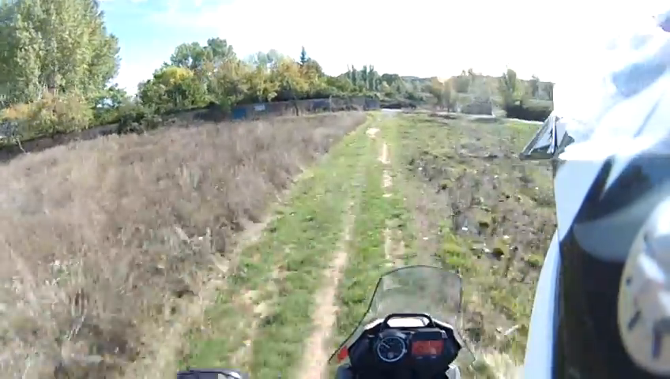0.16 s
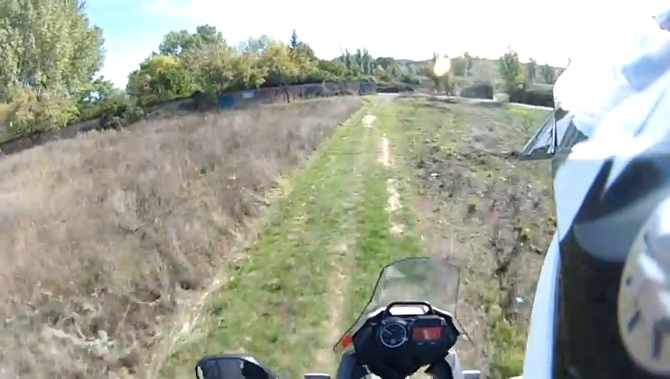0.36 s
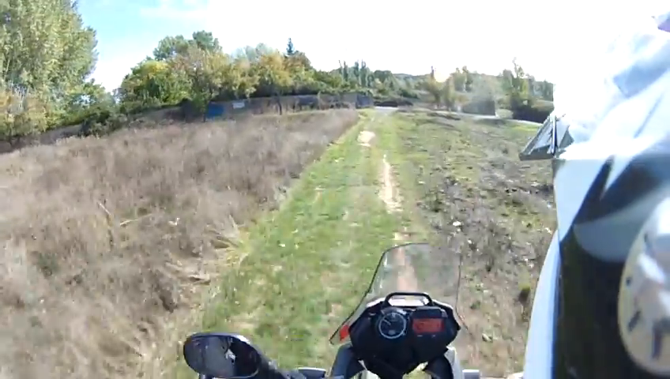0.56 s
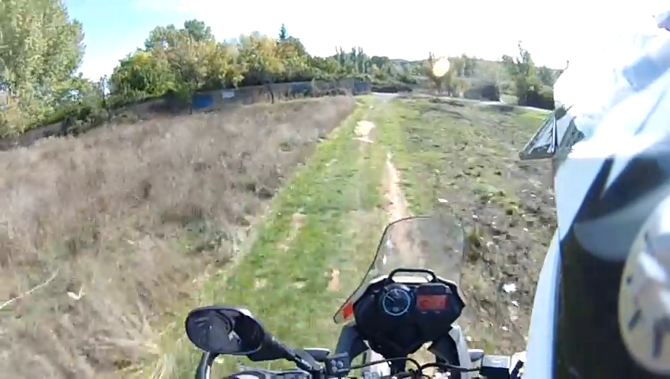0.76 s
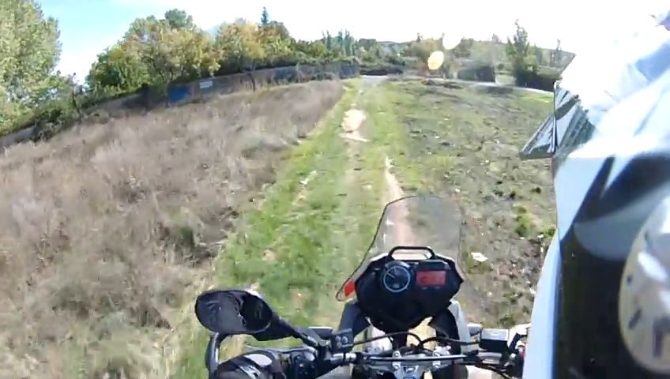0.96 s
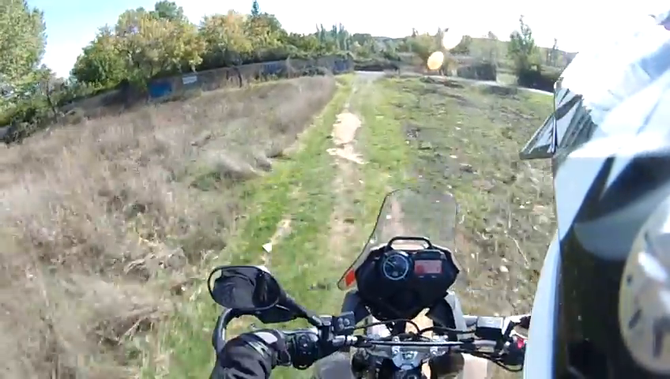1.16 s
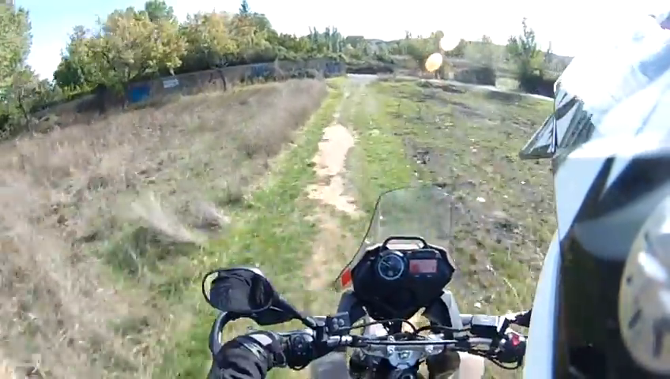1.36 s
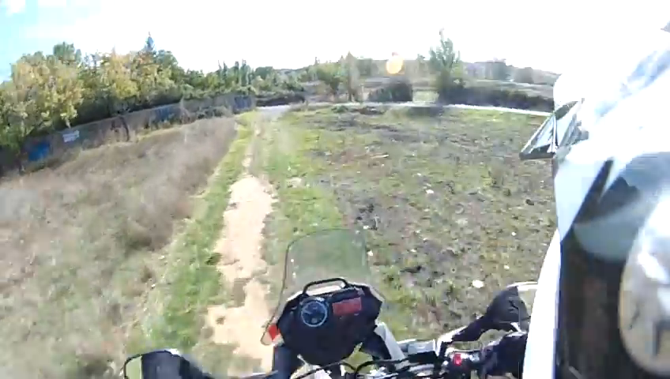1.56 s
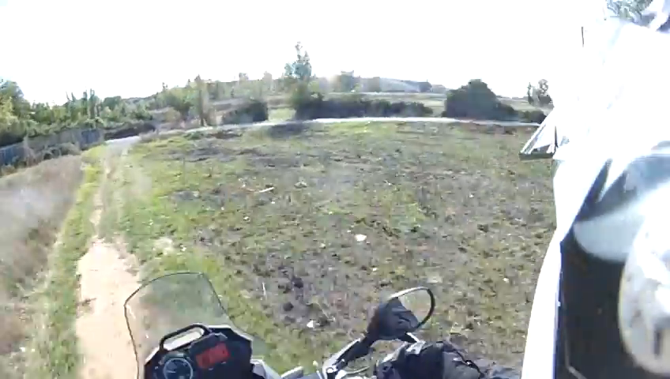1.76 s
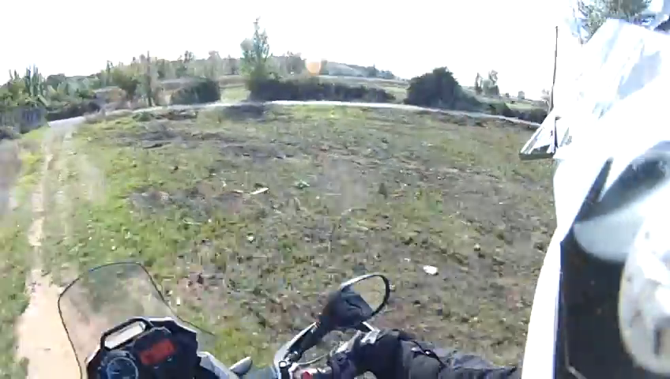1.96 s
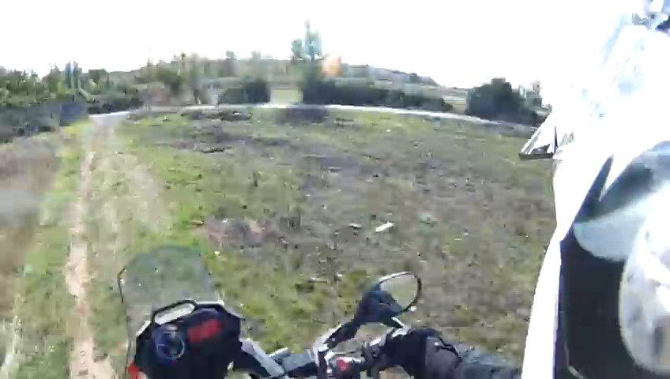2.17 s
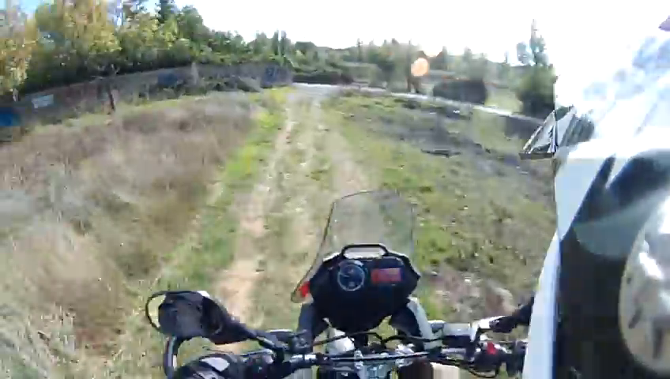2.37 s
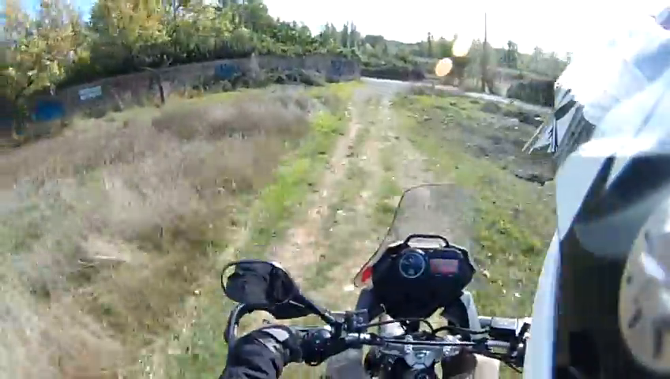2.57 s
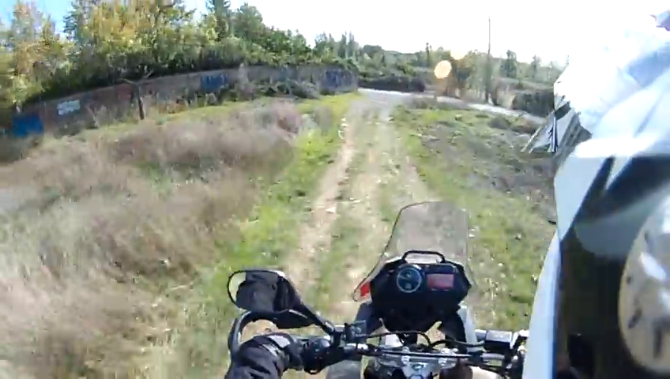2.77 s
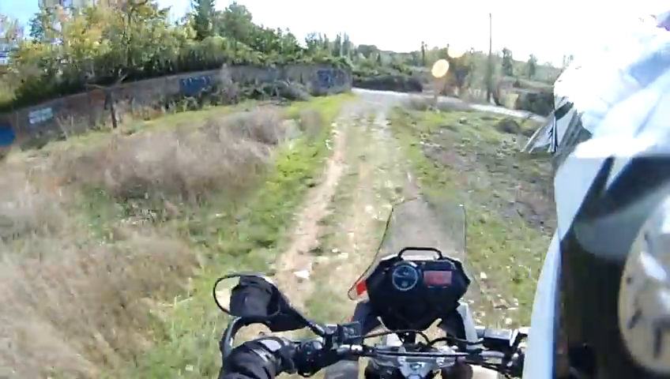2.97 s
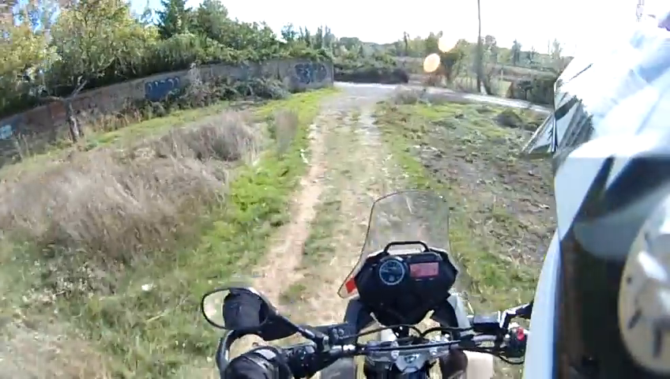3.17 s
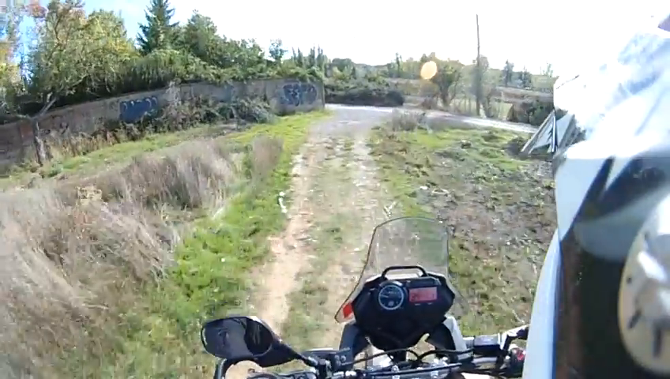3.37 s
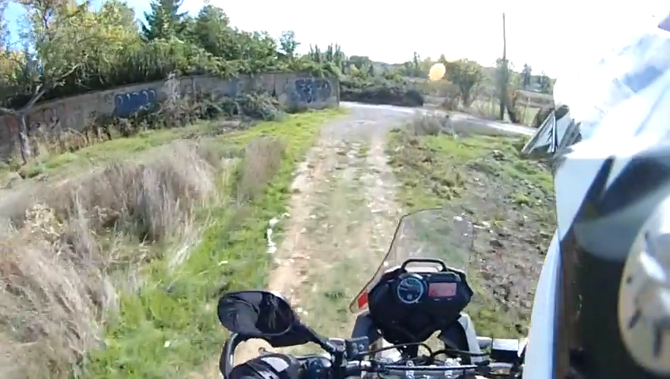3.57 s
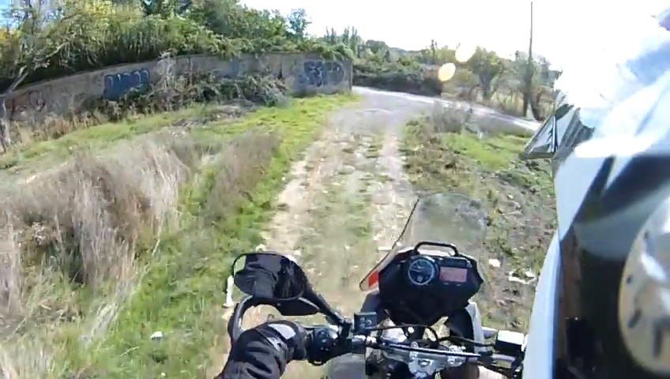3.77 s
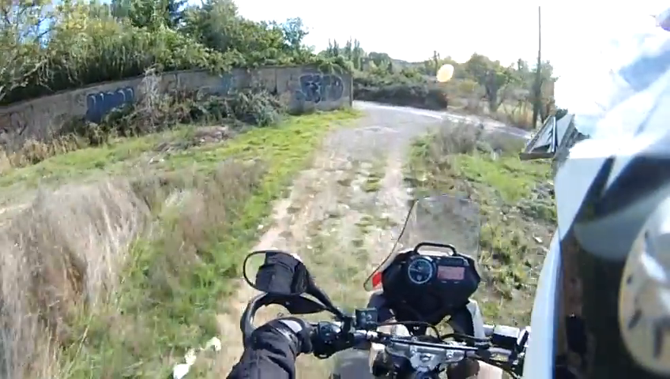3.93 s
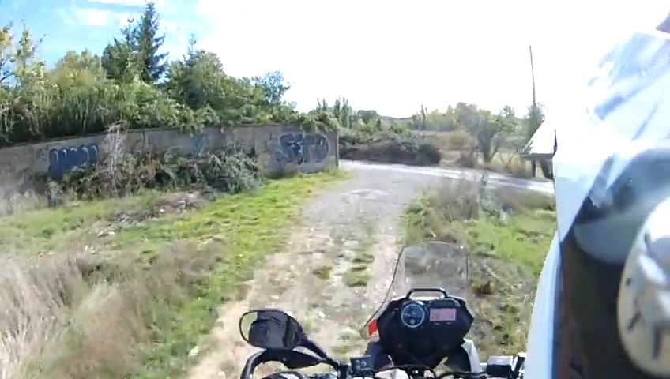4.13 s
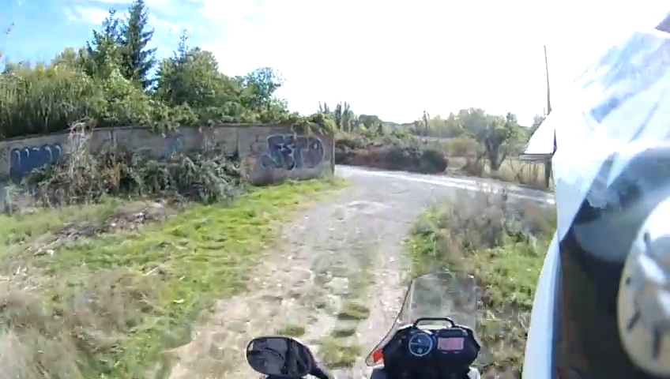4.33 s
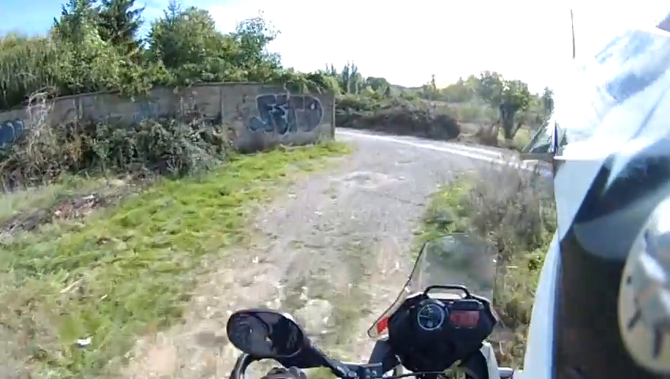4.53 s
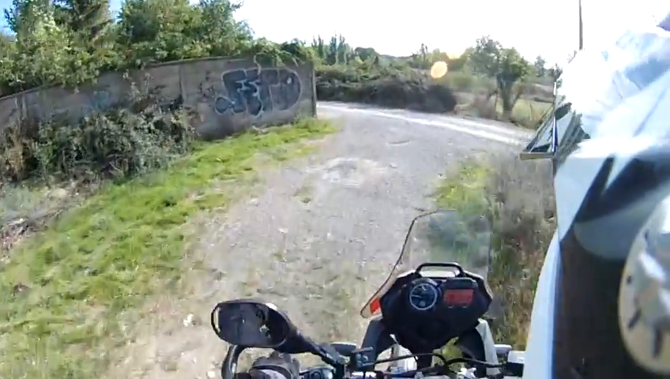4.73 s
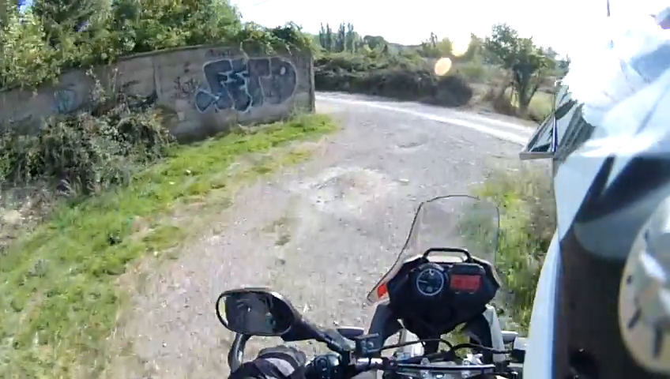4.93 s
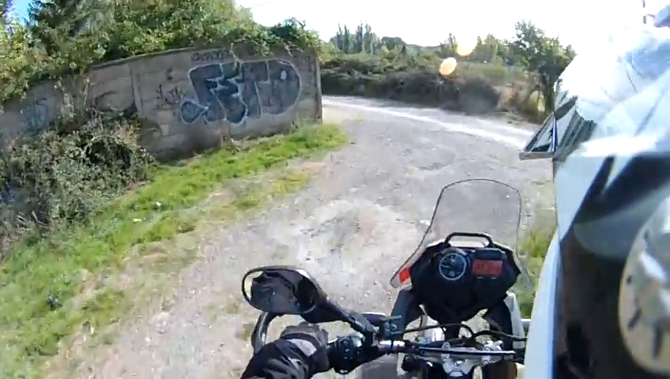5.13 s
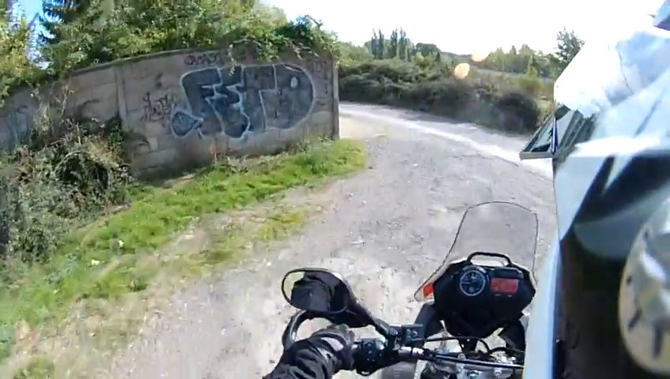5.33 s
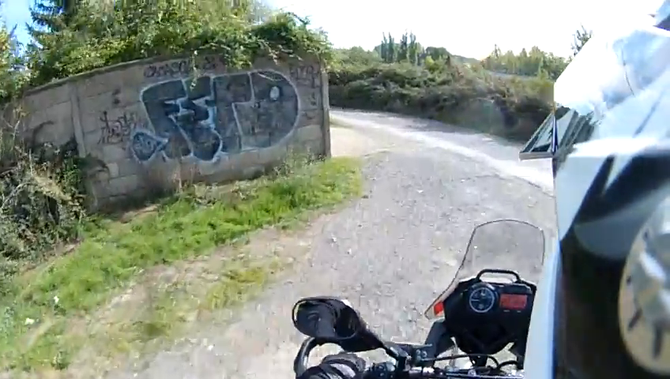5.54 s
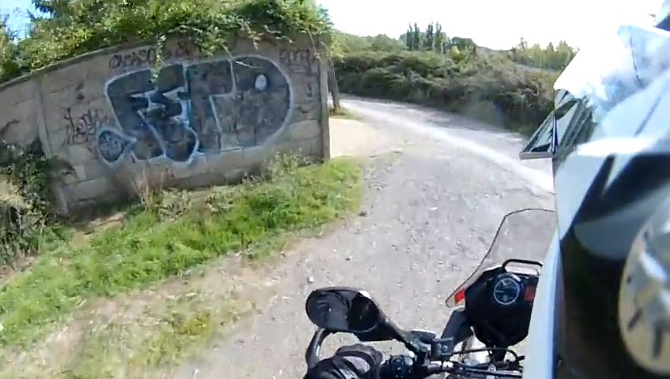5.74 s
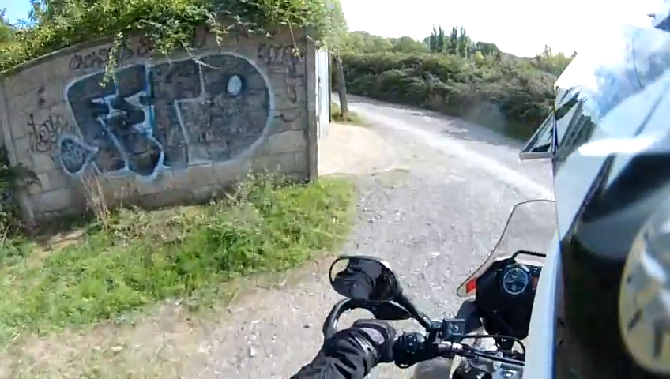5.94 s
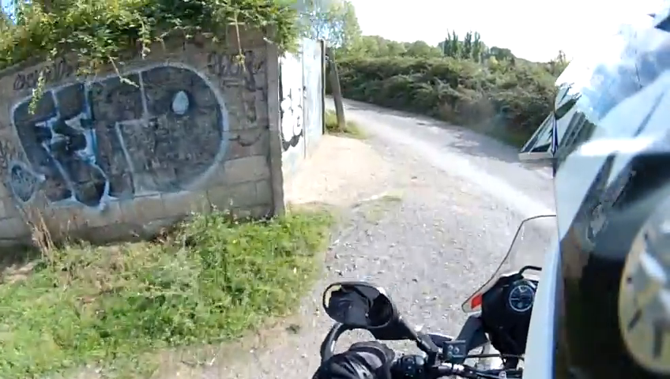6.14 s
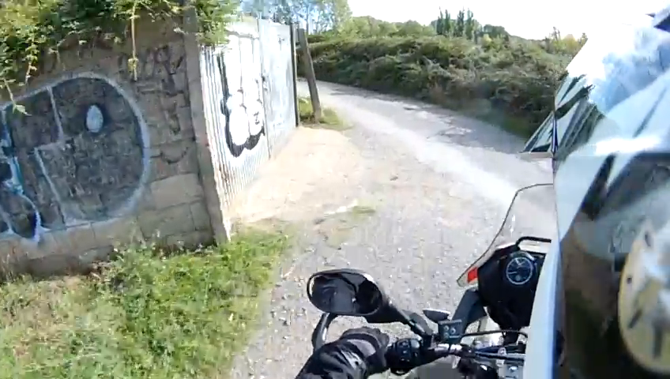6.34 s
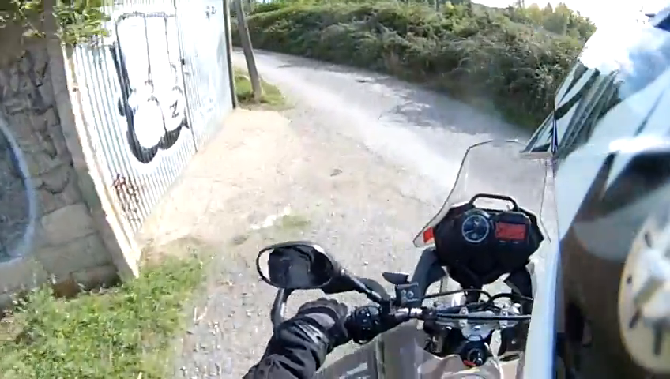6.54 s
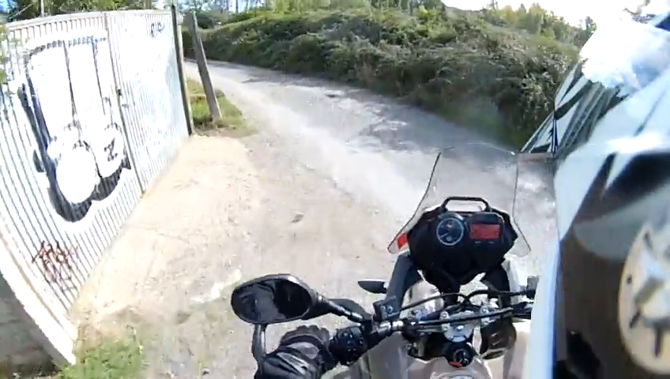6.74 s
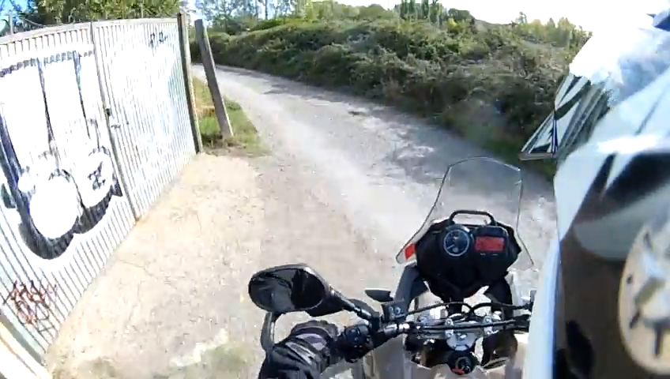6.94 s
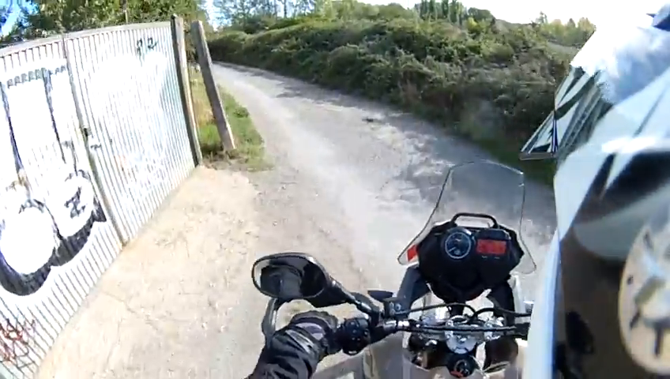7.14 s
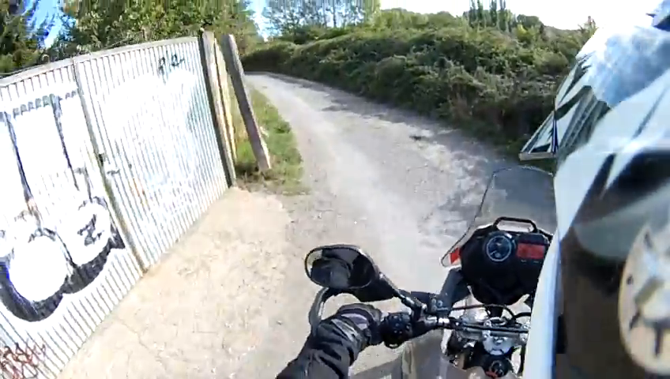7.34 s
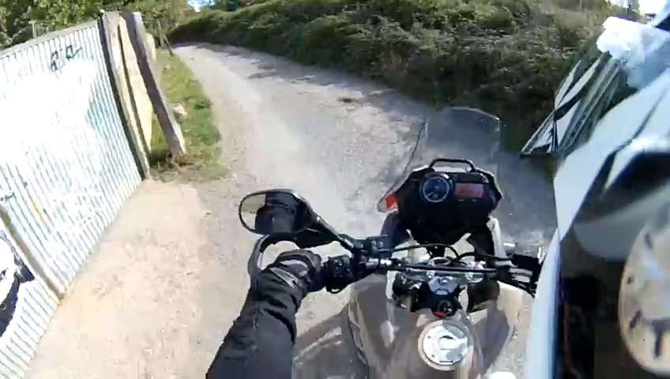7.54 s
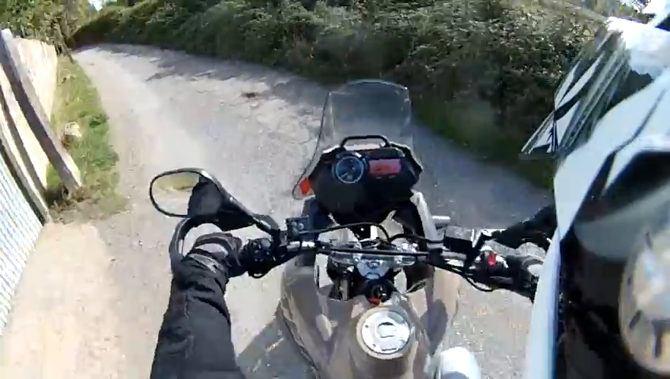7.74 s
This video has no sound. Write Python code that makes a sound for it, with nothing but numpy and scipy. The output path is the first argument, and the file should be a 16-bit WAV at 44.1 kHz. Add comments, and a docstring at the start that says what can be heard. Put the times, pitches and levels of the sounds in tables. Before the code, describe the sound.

Muffled motorcycle ride: roaring wind and low thuds fade as the engine putters slower, knocks and boot scuffs follow, then quiet handling rustle and still air.

```python
"""Wind buffets a sealed helmet camera while its rider's single-cylinder motorcycle slows on a dirt track and stops.
The wind is noise mixed with small pressure pulses, split into rumble, roar and hiss; low slaps are fading noise.
The engine hums, thumps, puffs and ticks faintly, timed by its firing cycle. Hard knocks (loud engine ticks, later
bumps of the helmet) are noise bursts and ringing pushes; rubs are grainy noise through the modes of the shell. The
mount pings and creaks as sine tones; a dragged boot, two brake squeaks, still air and circuit hiss are shaped noise."""
import sys
import numpy as np
from scipy import signal
from scipy.fft import rfft, irfft
from scipy.io import wavfile
from scipy.ndimage import uniform_filter1d, map_coordinates

SR = 44100
rng = np.random.default_rng(int(sys.argv[2]) if len(sys.argv) > 2 else 0)


def inscribe(sig):
    """Save sig as 16-bit PCM at rate SR to the path in sys.argv[1].

    A 1-D sig is mono; a 2-D sig holds one channel per row.
    Samples are clipped to [-1, 1] before scaling.
    """
    pcm = np.round(np.clip(np.atleast_2d(sig).T, -1, 1) * 32767)
    wavfile.write(sys.argv[1], SR, pcm.astype(np.int16))


N = 343980
T = np.arange(N) / SR  # time of every sample [s]

# Tone of the turbulence at the port, shared by wind and slaps: (frequency [Hz], relative level [dB])
WIND_COLOUR = [(11, -48), (18, -26.5), (85, -8), (175, 1), (212, 1), (344, 0), (557, 0), (692, -3),
               (971, -10), (1460, -24.5), (2160, -30.5), (3330, -38.5), (3850, -38), (4790, -47),
               (5810, -65), (7550, -84), (12800, -120)]


def undb(db):
    """Turn decibels into a plain multiplier."""
    return 10 ** (np.asarray(db) / 20)


def unit(x):
    """Scale a sound to an average (RMS) level of 1."""
    return x / np.sqrt(np.mean(x ** 2))


def columns(table):
    """Draw straight lines between a table's times: one value a sample for each later column."""
    s, *rest = np.transpose(table)
    return [np.interp(T, s, c) for c in rest]


def colour(x, points, size=4096):
    """Filter with the gain of (Hz, dB) points, never sounding before its input (folded cepstrum)."""
    hz, db = np.transpose(points)
    bins = np.maximum(np.arange(size // 2 + 1) * SR / size, 1)
    log_gain = np.interp(np.log(bins), np.log(hz), db) * np.log(10) / 20
    cepstrum = irfft(log_gain)
    cepstrum[1:size // 2] *= 2
    cepstrum[size // 2 + 1:] = 0
    response = irfft(np.exp(rfft(cepstrum)))
    return signal.fftconvolve(x, response)[:N]


def ring(x, modes):
    """Sum of (Hz, width Hz, dB) resonances, each applied twice for dark valleys between them."""
    out = 0
    for hz, width, db in modes:
        # two passes narrow the peak, so each one starts wider
        b, a = signal.iirpeak(hz, hz / (1.5 * width), SR)
        once = signal.lfilter(b, a, x)
        out = out + undb(db) * signal.lfilter(b, a, once)
    return out


def walk(rate):
    """A wandering random curve: levels drawn at the rate [per s], smoothed twice, RMS 1."""
    k = int(SR / rate)
    steps = np.repeat(rng.standard_normal(N // k + 1), k)
    return unit(uniform_filter1d(uniform_filter1d(steps, k), k)[:N])


def grains(rate, scatter_db):
    """One-sided pressure pulses at random moments, a few larger than the rest."""
    hit = rng.random(N) < rate / SR
    x = hit * undb(scatter_db * np.minimum(rng.exponential(size=N), 5))
    return unit(x - x.mean())


def hold(s, length, rise, fall):
    """Ramp up to 1 by time s, hold for the length, then ramp down to 0."""
    corners = np.cumsum([s - abs(rise), abs(rise), abs(length), abs(fall)])
    return np.interp(T, corners, [0, 1, 1, 0])


def decay(t, t60):
    """Exponential fade that falls 60 dB in t60 seconds."""
    return np.exp(-t * np.log(1000) / t60)


def still_air():
    """Soft noise of the still air, with a slightly unsteady level."""
    # tone of the still air: (frequency [Hz], relative level [dB])
    air_tone = [(11, -45.5), (18, -17.5), (85, 5), (171, -0.5), (269, -2.5), (539, 2), (981, 3.5),
                (1310, -12.5), (2950, -17.5), (3250, -20.5), (5500, -37.5), (7150, -59), (12100, -120)]
    level_db = -62.5
    return unit(colour(rng.standard_normal(N), air_tone)) * undb(level_db + 1.2 * walk(20))


def brake():
    """A pad sings unsteadily as the disc slides by: noise through one narrow resonance."""
    # squeaks: (middle time [s], half length [s], level [dB])
    squeaks = [(6.08, .035, -86), (6.555, .045, -82)]
    squeak_hz, width_hz = 7200, 80
    song = unit(ring(rng.standard_normal(N), [(squeak_hz, width_hz, 0)]))
    return song * sum(undb(db) * np.exp(-((T - s) / half) ** 2) for s, half, db in squeaks)


def scrape():
    """A boot sole drags on gravel: dense grit clicks and noise excite broad resonances."""
    # drags of the boot: (time [s], length [s], level [dB])
    drags = [(5.88, 0.09, -60.5), (5.962, 0.036, -52), (6.004, 0.036, -52.5), (6.06, 0.224, -64)]
    # resonances of the grit: (frequency [Hz], width [Hz], level [dB])
    grit_modes = [(1510, 220, 1.5), (2350, 220, 3), (2630, 90, 2), (3330, 500, -7), (4500, 800, -11)]
    rise_s, fall_s = 0.012, 0.027
    grit = rng.standard_normal(N) + .6 * grains(400, scatter_db=2.5)
    drag = sum(undb(db) * hold(s, length, rise_s, fall_s) ** 2 for s, length, db in drags)
    return unit(ring(grit, grit_modes)) * drag


def creak():
    """The mount slips in regular stick-slip: a wavering, sagging tone with a weak third multiple."""
    start_s, length_s, level_db = 6.842, .05, -41
    start_hz, sag_hz_per_s = 370, 1150
    hz = start_hz - sag_hz_per_s * np.clip(T - start_s, 0, length_s)
    phase = 2 * np.pi * np.cumsum(hz * (1 + 0.03 * walk(90))) / SR
    tone = unit(np.sin(phase) + undb(-15) * np.sin(3 * phase))
    slipping = hold(start_s, length_s, 0.0094, 0.0067)
    return tone * undb(level_db + 1.5 * walk(60)) * slipping


def rubs():
    """Stick-slip grains of cloth ring the lowest, the middle and the high modes of the flexing shell."""
    # rubs: (time [s], length [s], middle modes [dB], lowest modes [dB], high modes [dB])
    touches = [(6.602, 0.018, -39.5, -40, -54), (6.638, 0.043, -47.5, -48, -54.5),
               (6.689, 0.074, -42.5, -61, -52), (6.779, 0.045, -52, -68, -57),
               (6.842, 0.018, -57, -55, -60), (6.864, 0.035, -48, -50, -50.5),
               (6.958, 0.036, -70, -72, -62), (7.518, 0.058, -55, -71, -69), (7.583, 0.006, -54, -43, -55),
               (7.598, 0.031, -50, -43.5, -48.5), (7.641, 0.033, -45.5, -52, -50),
               (7.687, 0.044, -57, -62, -61)]
    # modes of the helmet shell: (frequency [Hz], width [Hz], level [dB])
    shell = [(132, 45, 0), (240, 80, -8), (355, 60, 0), (440, 60, -2), (530, 70, -5), (980, 50, -1),
             (1200, 100, -7), (1400, 150, -12), (2080, 320, -12), (2620, 280, -16), (3300, 180, -15),
             (4900, 1200, -33)]
    rise_s, fall_s = 0.0085, 0.028
    bend_s, flicker_db = .0002, 2  # flexing bends the pitch; each mode comes and goes
    slip = rng.standard_normal(N) + 0.58 * grains(270, scatter_db=0.5)
    modes = [ring(slip, [mode]) * undb(flicker_db * walk(25)) for mode in shell]
    bent = (T + bend_s * walk(30)) * SR  # read positions that run slightly early or late
    groups = modes[:2], modes[2:5], modes[5:]
    boom, body, edge = (unit(map_coordinates(sum(group), [bent], mode="mirror")) for group in groups)
    out = 0
    for s, length, body_db, boom_db, edge_db in touches:
        touch = hold(s, length, rise_s, fall_s) ** 2
        out = out + (body * undb(body_db) + boom * undb(boom_db) + edge * undb(edge_db)) * touch
    return out


def pings():
    """Single modes of the mount swell quickly and die away, wavering a little."""
    # pings: (time [s], frequency [Hz], level [dB], 60 dB decay time [s])
    struck_modes = [(5.484, 2400, -41, 0.046), (5.932, 1980, -39, 0.028), (5.968, 697, -25.5, 0.064),
                    (5.979, 2400, -42, .06), (5.994, 450, -36, .06), (6.018, 2580, -44, .04),
                    (6.045, 2550, -47, .04), (6.603, 970, -42, .12), (7.632, 990, -48, .12),
                    (7.665, 2700, -55, .05)]
    rise_s = 0.0017
    out, waver = 0, .08 * walk(150)  # waver in turns of the tone
    for s, hz, db, t60 in struck_modes:
        t = np.maximum(T - s, 0)
        fade = (1 - np.exp(-(t / rise_s) ** 2)) * decay(t, t60)
        out = out + undb(db) * fade * np.sin(2 * np.pi * (hz * t + rng.random() + waver))
    return out


def knocks():
    """Hard knocks: loud engine ticks, and later bumps of the helmet; a push and noise ring a dull thud, with a crack."""
    # knocks: (time [s], thud peak [dB], thud pitch [Hz], crack peak [dB], crack treble peak [dB],
    #          60 dB decay time of the noise [s])
    hits = [(2.430, -35, 500, -48, -50, .03), (3.619, -43, 500, -32, -45, 0.038),
            (3.674, -45, 504, -57, -50, .025), (3.945, -48, 500, -37, -58, 0.044),
            (3.997, -47, 500, -35, -49, .03), (4.051, -49, 500, -44, -48, 0.033),
            (4.225, -44, 500, -52, -53, .05), (4.334, -31, 500, -39, -47, .04),
            (4.382, -42, 500, -47, -61, .03), (4.465, -54, 500, -47, -65, .04),
            (4.525, -43, 497, -47, -46, .027), (4.58, -46, 500, -40, -55, 0.038),
            (4.649, -42, 504, -39, -59, 0.044), (4.725, -47, 600, -36, -50, 0.037),
            (4.8116, -11, 434, -27, -45, 0.064), (4.8166, -15.5, 575, -26.5, -39.5, 0.039),
            (5.009, -57, 500, -63, -52, .025), (5.057, -54, 500, -49, -48, 0.033),
            (5.105, -44, 500, -34, -56, .05), (5.216, -55, 500, -62, -58, .02),
            (5.311, -38, 700, -36, -51, .034), (5.485, -40, 600, -42, -58, .04),
            (5.630, -23, 825, -42, -61, 0.041), (5.932, -44, 500, -39, -63, .02),
            (5.958, -34, 600, -34, -44, 0.03), (5.977, -32, 680, -33, -46, .025),
            (6.02, -44, 500, -50, -56, .03), (6.599, -46, 330, -42, -72, .03),
            (6.663, -33, 990, -60, -70, .03), (6.768, -31.5, 750, -66, -76, .015),
            (7.092, -42, 600, -55, -70, .012), (7.58, -32, 400, -68, -78, .05),
            (7.585, -34, 400, -68, -78, .05)]
    # tones of the crack's lower and upper band: (frequency [Hz], level [dB])
    crack_tone = [(600, -16), (1200, 1), (1700, 1), (2450, 0), (2900, -5), (3600, -11), (4600, -26)]
    treble_tone = [(2400, -24), (3200, -2), (3900, 2), (4800, -1), (5600, -4), (7500, -11), (10000, -25)]
    rise_s = .001
    thud_width = .5  # share of each resonance's pitch
    boom_share, boom_db = .33, -2  # lower resonance: share of the thud pitch, level
    out = np.zeros(N)
    t = np.arange(SR // 10) / SR
    for s, thud_db, thud_hz, crack_db, treble_db, t60 in hits:
        noise = rng.standard_normal(len(t)) * decay(t, t60) * np.minimum(t / rise_s, 1)
        push = -2 * np.exp(-((t - .001) / .0004) ** 2)
        boom_hz = boom_share * thud_hz
        thud_modes = [(thud_hz, thud_width * thud_hz, 0), (boom_hz, thud_width * boom_hz, boom_db)]
        thud = ring(noise + push, thud_modes)
        crack = colour(noise, crack_tone)[:len(t)]
        treble = colour(noise, treble_tone)[:len(t)]
        i = int(s * SR)
        for db, part in ((thud_db, thud), (crack_db, crack), (treble_db, treble)):
            out[i:i + len(t)] += undb(db) * part / np.abs(part).max()
    return out


def engine():
    """The frame hums at multiples of the firing rate; each cycle gives a thump, a gas puff, a clack and a tick."""
    # engine levels: (time [s], hum [dB], exhaust puff [dB], valve tick [dB])
    levels = [(0, -45, -40, -80), (1, -38, -40, -80), (2.3, -38, -41, -79), (2.55, -37, -39, -75),
              (2.9, -37, -40, -72.5), (3.15, -38, -42, -78), (3.5, -45, -43, -83), (4.6, -46, -43, -84),
              (5.4, -58, -54, -90), (6.2, -80, -75, -105)]
    # engine speed: (time [s], firings per second [Hz])
    firing = [(0, 26.84), (1.5, 23.26), (2.4, 20.66), (2.7, 19.06), (3.2, 18.23), (3.5, 17.07),
              (3.9, 18.95), (4.6, 17.82), (4.9, 20.71), (5.3, 19.74), (7.8, 17)]
    # hum partials: (multiple of the firing rate, level [dB])
    hum_partials = [(2, -14), (3, -3), (4, 3), (5, -8), (6, -12), (7, -5), (8, -2), (9, -5), (10, -10),
                    (11, -9), (12, -11)]
    # resonances of exhaust pipe, tappet and valve: (frequency [Hz], width [Hz], level [dB])
    pipe = [(179, 160, 3), (520, 300, -5)]
    tappet = [(2390, 83, -1.5), (3750, 800, -11.5)]
    valve = [(5150, 900, 0)]
    # tappet clack: (time [s], level [dB])
    clack_level = [(0, -68), (1.6, -68), (2.5, -79), (3.6, -79), (4.05, -71), (5.1, -72), (6.2, -95)]
    first_turn, swell_share, tick_share = -.99, .06, .03  # shares of a cycle: start, puff peak, tick peak
    tick_scatter_db, strike = 1.8, 2  # spread of the ticks; clean strike against the rattle after it
    thump_s, thump_db = .00055, 3  # half width of the pressure pulse; its level against the puff
    hum_db, puff_db, tick_db = columns(levels)
    clack_db = columns(clack_level)[0]
    rate = columns(firing)[0]
    cycles = first_turn + np.cumsum(rate) / SR
    share = cycles % 1  # how far through the cycle
    hum = sum(undb(db + 1.5 * walk(3)) * np.sin(2 * np.pi * (k * cycles + rng.random()))
              for k, db in hum_partials)

    turn = np.floor(cycles).astype(int) + 1
    scatter = rng.standard_normal((turn.max() + 1, 3))[turn].T  # new strengths every cycle
    swell = share / swell_share * np.exp(-share / swell_share)
    puff, clack = swell * undb(1.8 * scatter[:2]) * rng.standard_normal((2, N))

    snap = share / tick_share
    rattle = snap * np.exp(-snap) * rng.standard_normal(N)
    tick = rattle + strike * np.diff(turn, prepend=turn[0])
    tick = tick * undb(tick_scatter_db * scatter[2])

    since = (share - swell_share) / rate  # seconds from the pulse's peak
    pulse = undb(2 * scatter[0]) * np.exp(-(since / thump_s) ** 2)
    # slope of the pulse, then a 150 Hz smoother: together they remove the lowest bass
    thump = signal.lfilter([1], [1, -np.exp(-2 * np.pi * 150 / SR)], np.diff(pulse, prepend=0))

    out = unit(thump) * undb(puff_db + thump_db) + unit(hum) * undb(hum_db)
    out = out + unit(ring(puff, pipe)) * undb(puff_db)
    out = out + unit(ring(clack, tappet)) * undb(clack_db)
    return out + unit(ring(tick, valve)) * undb(tick_db)


def slaps():
    """Short low slaps of wind, some of them exhaust puffs: fading noise with the wind's tone, dulled above 1 kHz."""
    # slaps: (time [s], peak level [dB])
    slap_hits = [(0.138, -18.5), (0.54, -30), (0.79, -12.5), (0.902, -18), (0.951, -11), (1.101, -26),
                 (1.135, -15), (1.199, -18.5), (1.321, -22), (1.397, -20), (1.433, -21.5), (1.468, -20),
                 (2.048, -19.5), (2.279, -23), (2.406, -26), (2.843, -30), (3.168, -30), (3.393, -37.5),
                 (3.483, -31), (4.202, -24), (4.316, -13.5), (4.385, -24), (4.462, -36), (4.571, -22.5),
                 (4.759, -28), (4.887, -25), (4.896, -30), (5.377, -30), (5.466, -23.5)]
    t60_s = 0.036
    dull = signal.butter(4, 1000, fs=SR, output="sos")
    out = np.zeros(N)
    t = np.arange(SR // 10) / SR
    for s, db in slap_hits:
        burst = rng.standard_normal(len(t)) * decay(t, t60_s)
        burst = signal.sosfilt(dull, colour(burst, WIND_COLOUR)[:len(t)])
        i = int(s * SR)
        out[i:i + len(t)] += undb(db) * burst / np.abs(burst).max()
    return out


def wind():
    """Eddies pop on the port over smooth turbulence; buffets shake every band, upper roar and hiss also flicker."""
    # wind as the speed falls: (time [s], roar [dB], rumble [dB], hiss [dB])
    levels = [(0.0, -22, -40, -45.5), (0.28, -24.5, -47, -43.5), (0.48, -26, -46, -46.5),
              (0.78, -24.5, -46.5, -43.5), (1.13, -30, -45.5, -46.5), (1.52, -30, -44.5, -49),
              (2.0, -34.5, -47.5, -51.5), (2.47, -33, -44, -53), (3.28, -36.5, -50, -56.5),
              (3.78, -37, -49, -58.5), (4.32, -31, -41, -56.5), (4.45, -31, -38.5, -55.5),
              (5.1, -40, -50.5, -60), (5.54, -41.5, -51, -61.5), (5.67, -42, -48.5, -63),
              (6.58, -53, -63.5, -68), (7.15, -64, -77, -68.5), (7.8, -63, -72, -69)]
    # passing gusts: (time [s], length [s], roar lift [dB], upper roar lift [dB], hiss lift [dB])
    gusts = [(0.62, 0.11, 1.5, 1.5, 1), (1.54, 0.082, 3, 3.5, 0.5), (1.845, 0.042, 3, 1.5, 3.5),
             (2.404, 0.05, 7, 2.5, 4.5), (3.365, 0.23, 4.5, 1.5, -0.5), (4.31, 0.084, 2.5, -3.5, 3),
             (5.12, 0.024, 3.5, 3, 4), (5.323, 0.31, 3.5, 7.5, 7), (5.417, 0.094, -1, 3.5, -1)]
    # brightness of the top of the hiss: (time [s], gain above edge_hz [dB])
    edge = [(0, 5), (1, 0.5), (2.3, 2), (2.8, -4.5), (4, 0), (5.2, -3.5), (5.7, -3.5), (7.8, 3)]
    rumble_hz, bright_hz, hiss_hz, edge_hz = 89, 620, 1332, 3300  # borders between the bands
    rise_s, fall_s = 0.017, 0.048  # of a gust
    roar_db, rumble_db, hiss_db = columns(levels)
    upper_db = roar_db
    for s, length, roar_lift_db, upper_lift_db, hiss_lift_db in gusts:
        gust = hold(s, length, rise_s, fall_s)
        roar_db = roar_db + roar_lift_db * gust
        upper_db = upper_db + upper_lift_db * gust
        hiss_db = hiss_db + hiss_lift_db * gust

    eddies = grains(900, scatter_db=1.5)
    flow = colour(rng.standard_normal(N) + 0.74 * eddies, WIND_COLOUR)
    fine = colour(rng.standard_normal(N) + 0.48 * eddies, WIND_COLOUR)
    low = signal.butter(4, rumble_hz, fs=SR, output="sos")
    mid = signal.butter(4, [rumble_hz, hiss_hz], "band", fs=SR, output="sos")
    bright = signal.butter(2, bright_hz, "high", fs=SR, output="sos")
    high = signal.butter(4, hiss_hz, "high", fs=SR, output="sos")
    above_edge = signal.butter(3, edge_hz, "high", fs=SR, output="sos")

    buffet, sway = walk(55), walk(14)
    buffet = unit(buffet - uniform_filter1d(buffet, SR // 7))  # quick flutter only
    rumble = unit(signal.sosfiltfilt(low, flow)) * undb(rumble_db + 0.67 * buffet + 0.66 * sway)

    band = unit(signal.sosfiltfilt(mid, flow))
    upper = signal.sosfiltfilt(bright, band)
    roar = (band - upper) * undb(roar_db) + upper * undb(upper_db + .8 * walk(8))
    roar = roar * undb(1.5 * buffet + 0.22 * sway)

    hiss = unit(signal.sosfiltfilt(high, fine))
    top = signal.sosfiltfilt(above_edge, hiss)
    hiss = hiss - top + top * undb(columns(edge)[0] + 0.57 * walk(13))
    hiss = hiss * undb(hiss_db + 0.55 * buffet + 1.1 * walk(30) + 0.26 * sway)
    return rumble + roar + hiss


def scene():
    """Add all sources; the sealed case muffles the engine, knocks, rubs, mount and boot."""
    # how the case muffles the treble: (frequency [Hz], gain [dB])
    housing = [(5400, -5.5), (6000, -19), (7500, -20.5), (11000, -41.5), (13000, -54.5)]
    muffled = colour(scrape() + creak() + rubs() + pings() + knocks() + engine(), housing)
    return (still_air() + brake() + muffled + slaps() + wind())[None]


def record(dry):
    """The cavity colours the sound, the amplifier adds its hiss and the recorder cuts the top."""
    # dips of the microphone cavity: (frequency [Hz], gain [dB])
    port = [(1450, -1), (1750, -3.5), (1950, -0.5), (2950, -2), (3300, -5), (3800, -3.5)]
    # tone of the amplifier hiss: (frequency [Hz], relative level [dB])
    circuit = [(3000, -10), (5500, -2.5), (7200, -7.5), (10000, -14), (11700, -21.5), (13000, -19),
               (16000, -24)]
    circuit_db, top_hz = -85, 15700
    hiss = unit(colour(rng.standard_normal(N), circuit)) * undb(circuit_db)
    faded_in = dry[0] * np.minimum(T / .002, 1)
    cut = signal.ellip(8, .2, 70, top_hz, fs=SR, output="sos")
    return signal.sosfilt(cut, colour(faded_in, port) + hiss)[None]


dry = scene()
out = record(dry)
inscribe(out)
```